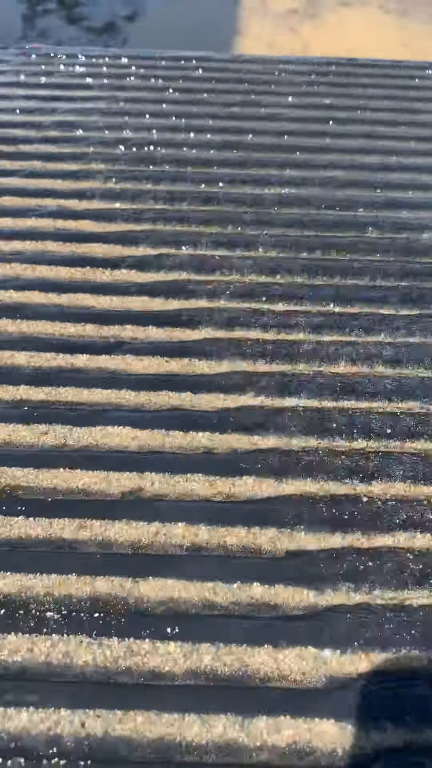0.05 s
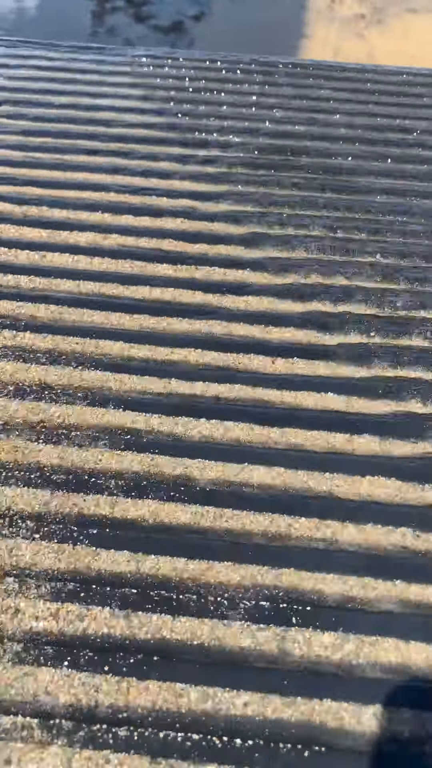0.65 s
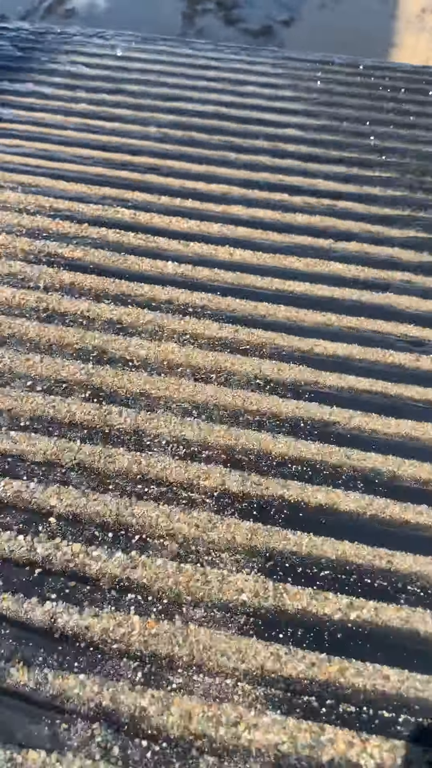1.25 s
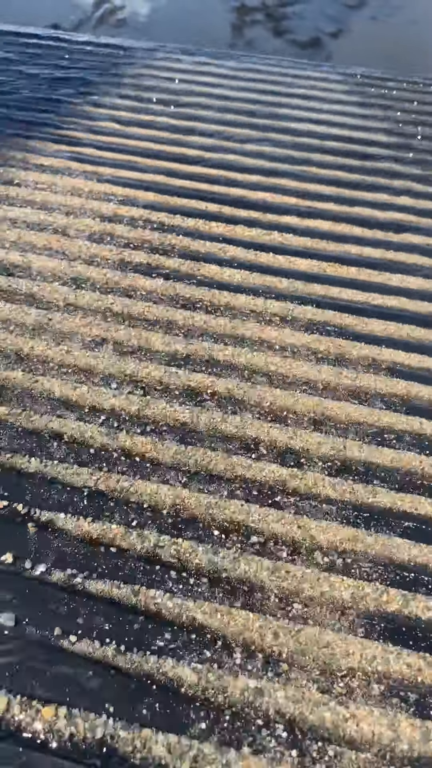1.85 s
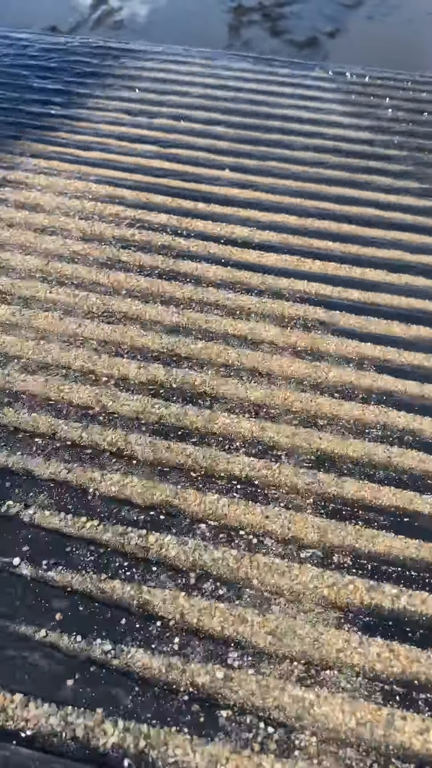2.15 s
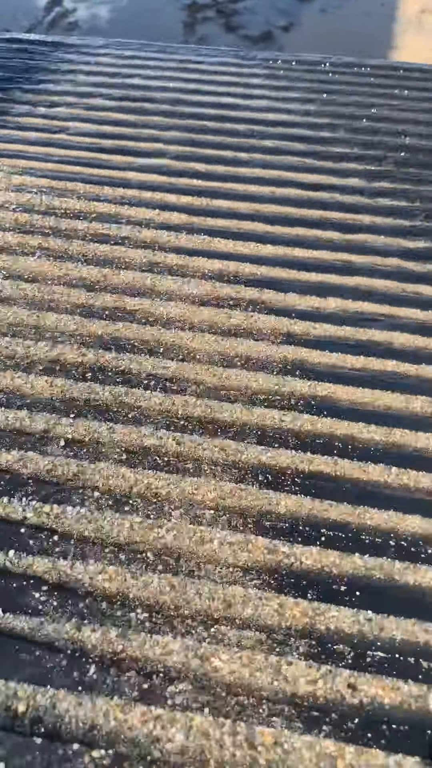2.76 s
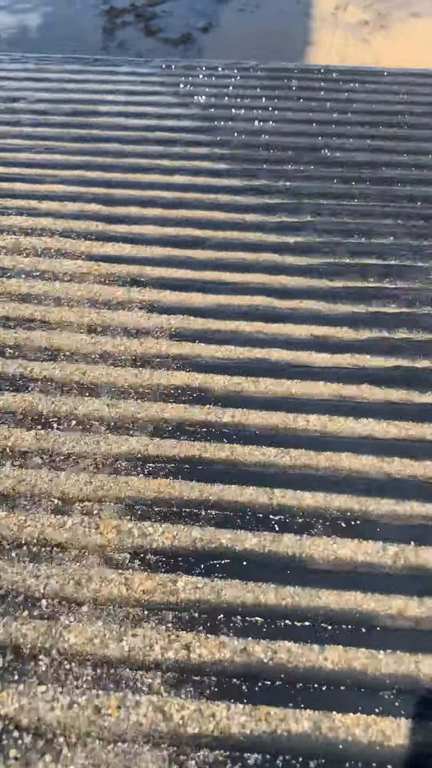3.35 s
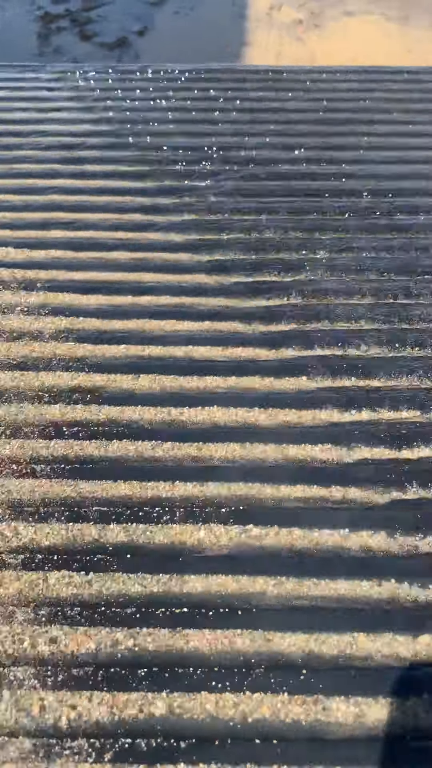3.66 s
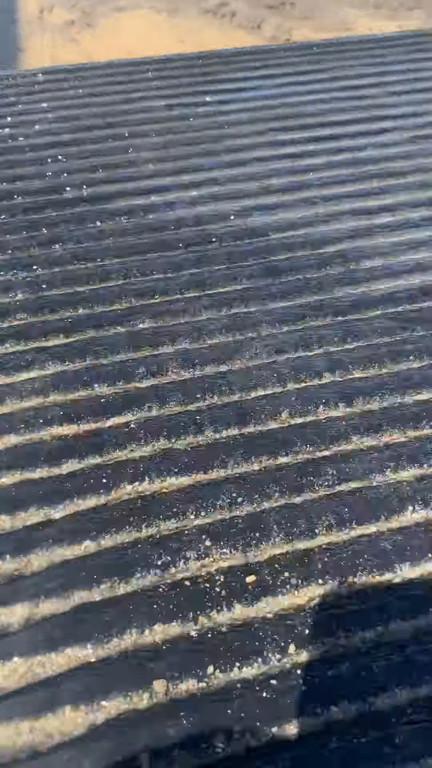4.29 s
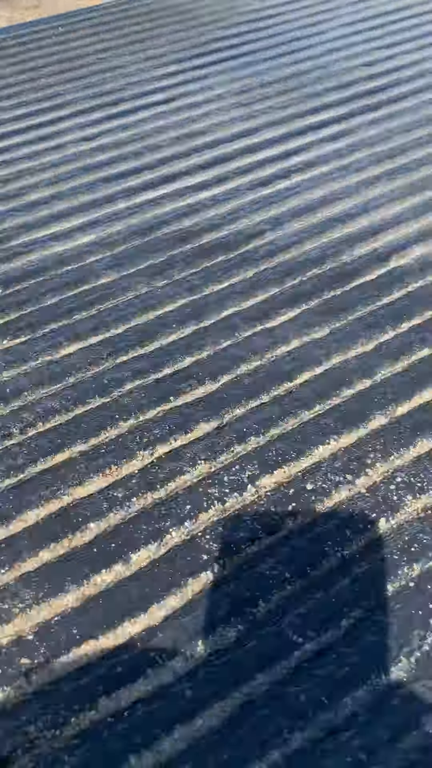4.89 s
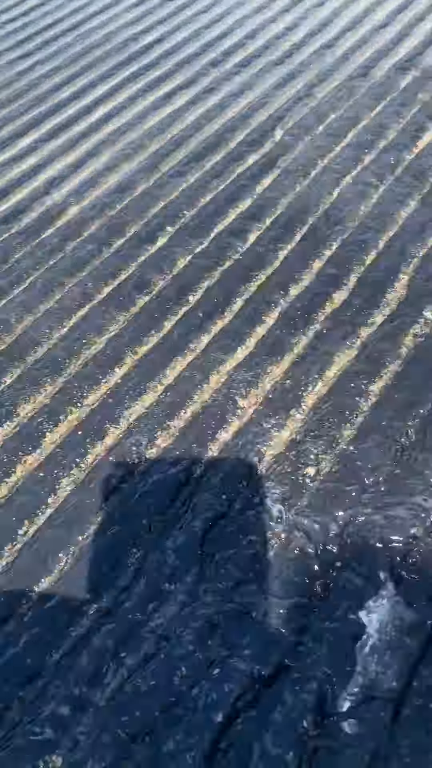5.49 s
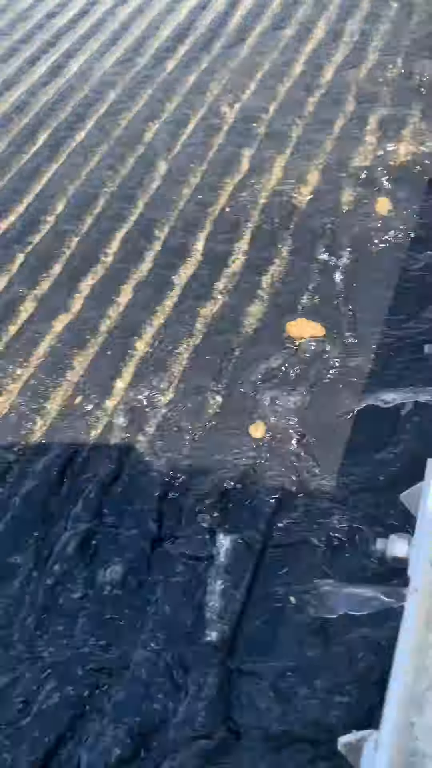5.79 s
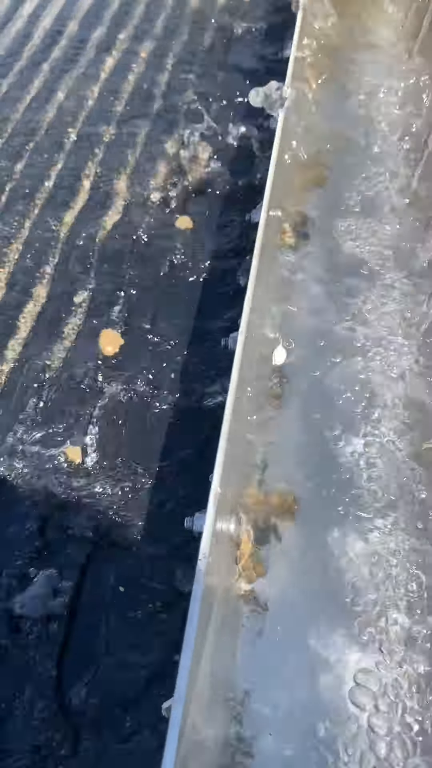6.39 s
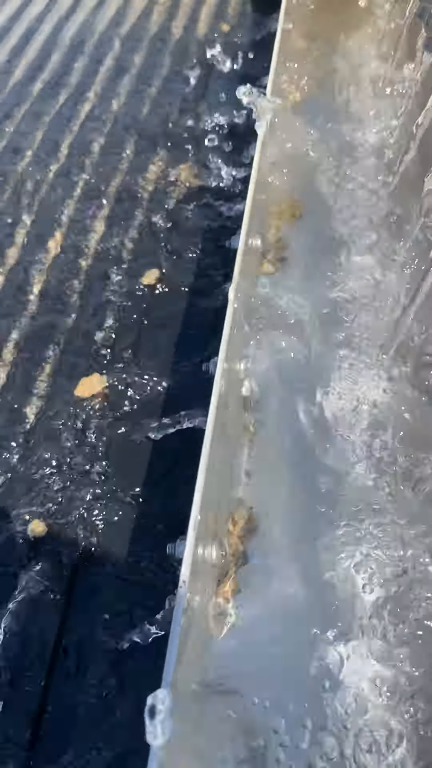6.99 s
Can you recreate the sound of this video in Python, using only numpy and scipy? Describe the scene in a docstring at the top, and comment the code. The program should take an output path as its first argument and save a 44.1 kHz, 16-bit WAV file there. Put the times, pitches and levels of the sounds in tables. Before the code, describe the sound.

From the start, a sand-washing shaker table runs outdoors with a low motor hum that throbs evenly about six times a second. Beneath it are a rumble, a dull frame rattle, soft double knocks and a faint pump drone. A thin sheet of water trickles over the ridged deck, with a fine fizz of sand and tiny bubbles and scattered drips and ticks. From about 2.5 seconds the hum slowly eases as the microphone moves away from the drive. Small waves slap from around 3 seconds. Between 4 and 5 seconds the microphone nears the edge, and water begins pouring and gurgling into a trough, pulsing with the shaking. From 5 seconds the water is close and brighter, with splashes, spray, ringing drips and sharp droplet smacks. These continue over the throbbing hum until the end at about 7 seconds.

```python
"""The drive of a sand-washing shaker table hums, throbbing under the load of six strokes a second.
A sheet of water trickles over the riffled deck, where sand and tiny bubbles fizz. Later the microphone
moves from the drive to the edge, where water pours, splashes and drips into a trough: impacts give
bursts of noise, and trapped air rings as bubbles. Beneath it all the frame rattles, slack in the drive
knocks and a pump drones."""
import sys
import numpy as np
from scipy import signal
from scipy.fft import rfft, irfft
from scipy.io import wavfile
from scipy.ndimage import uniform_filter1d

SR = 44100
rng = np.random.default_rng(int(sys.argv[2]) if len(sys.argv) > 2 else 0)


def master(y):
    """Save y as 16-bit WAV."""
    cut = np.clip(np.atleast_2d(y).T, -1, 1)
    pcm = np.round(cut * 32767)  # scale
    wavfile.write(sys.argv[1], SR, pcm.astype(np.int16))


N = 314874
T = np.arange(N) / SR
STROKE_HZ = 5.938

# Water flow over the deck. Each row: time in seconds, gain of the sheet in dB, gain of the fizz in dB.
FLOW = [(0, 1.7, -0.3), (.7, 0.6, 0), (1, 1.4, -0.5), (2.1, 2, 0.3), (3.2, 0.5, 0), (3.75, 1.4, 0.3),
        (4.2, -1.5, -3), (4.55, 0, -2.2), (7.14, 1, 2)]


def drive(hum_hz=119.95, leave_from_s=2.5, leave_to_s=6.1):
    """Modulation: each stroke's load varies the hum's amplitude, and each reversal sways its phase."""
    # The load cycle. Each row: share of the stroke, gain in dB before scaling by the throb depth.
    stroke_load = [(.02, -2.5), (.1, 4), (.21, -3.5), (.33, 3.5), (.44, 2), (.54, 4), (.66, 0), (.78, -4.5),
                   (.91, 3)]
    # The deck's response, which shapes the hum's sidebands. Each row: frequency in Hz, gain in dB.
    deck_response = [(80, 4), (100, -2), (120, 1), (134, -0.5), (148, -10), (170, -6), (300, 25)]
    away = np.clip((T - leave_from_s) / (leave_to_s - leave_from_s), 0, 1)
    level_db = -12.89 - 3.5 * away  # away from the drive the hum fades
    depth = .94 + (1.5 - .94) * away  # and its throb deepens
    share, load_db = np.transpose(stroke_load)
    throb_db = uniform_filter1d(np.interp(T * STROKE_HZ, share, load_db, period=1), int(.0068 * SR))
    turn = 4 * np.pi * (T * STROKE_HZ - .076)  # two reversals a stroke
    phase = 2 * np.pi * hum_hz * T + .54 * np.sin(turn) + .047 * np.sin(2 * turn)
    motor = np.sin(phase) * undb(depth * throb_db + .4 * walk(25.15))
    hum = unit(colour(motor, deck_response)) * undb(level_db)
    return hum + frame() * undb(.5 * (level_db - level_db.mean()))


def frame(rumble_db=-27):
    """Forced vibration: the shaken frame gives steady low tones and a rumble that swells each stroke."""
    # The frame's tones. Each entry: frequency in Hz in the first list, level in dB in the second.
    tone_hz = [47.6, 59.45, 67.63, 71.31, 77.2, 90.28, 96.21]
    tone_db = [-42.5, -38.5, -30.5, -35, -35, -44, -30.5]
    # The rumble's spectrum. Each row: frequency in Hz, relative density in dB.
    rumble_spectrum = [(20, -8), (35, -14), (50, -19), (68, 15.5), (95, 16.5), (125, 6.5), (150, 7),
                       (250, -74)]
    tones = sum(undb(db + .43 * walk(5)) * np.sqrt(2) * np.sin(2 * np.pi * (hz * T + rng.random()))
                for hz, db in zip(tone_hz, tone_db))
    jolt = 1 + 2 * per_stroke(at=.11, width=.25)
    return tones + unit(colour(rng.standard_normal(N) * jolt, rumble_spectrum)) * undb(rumble_db)


def water(near, level_db=-34, rise_db=3):
    """Air entrainment: water folds in ringing bubbles over the riffles and as it churns in the trough."""
    # Spectra of the thin sheet and of the churning. Each row: frequency in Hz, relative density in dB.
    sheet_spectrum = [(80, -9), (250, 16.5), (500, 2.5), (780, 3.5), (1050, 5.5), (1350, 0.5), (1700, -5),
                      (2400, -3), (3200, -4.5), (4500, -7), (8000, -89)]
    churn_spectrum = [(80, -55), (250, 9), (400, 5), (600, 9), (800, -1.5), (1100, 5.5), (1500, -3.5),
                      (1950, 5), (2700, -4.5), (4000, -38), (8000, -35)]
    surge = undb(.98 * per_stroke(at=.74, width=.14) + .9 * walk(22))
    sheet = unit(colour(grains(rate=6000, spread_db=3), sheet_spectrum))
    trickle = bubbles(count=1400, low_hz=1052, high_hz=4000, cycles=42, spread_db=3.5) * undb(-14)
    plops = bubbles(count=520, low_hz=599, high_hz=1380, cycles=24, spread_db=-2) * undb(-16)
    churn = unit(colour(grains(rate=2500, spread_db=4), churn_spectrum)) * undb(-2)
    froth = bubbles(count=2000, low_hz=866, high_hz=2300, cycles=25.5, spread_db=2.5) * undb(-7)
    gurgle = bubbles(count=420, low_hz=783, high_hz=2230, cycles=36, spread_db=1.5) * undb(-11.5)
    deck = np.sqrt(1 - near) * (sheet + trickle + plops) * undb(curves(FLOW)[0])
    trough = np.sqrt(near) * churn + near * froth + near ** 2 * gurgle
    return (deck + trough) * surge * undb(level_db + rise_db * near)


def pour():
    """Superposition: short bubble tones merge as water gulps over the lip, most strongly once a stroke."""
    # The swell of water over the lip. Each row: time in seconds, level in dB before the gulps.
    pour_level = [(0, -70), (4.4, -54), (4.85, -40.5), (5.25, -42), (5.6, -43), (6.4, -45), (7.14, -37.5)]
    gulps_db = 2.6 * walk(20) + 3 * per_stroke(at=.8, width=.16) - 1.5
    crowd = bubbles(count=4500, low_hz=711, high_hz=2600, cycles=18.5, spread_db=4)
    return crowd * undb(curves(pour_level)[0] + gulps_db)


def splashes(events, gain_db, spread=1.45):
    """Impact and entrainment: a rush of noise and bubbles around one pitch swells, then drains away."""
    out = np.zeros((3, N))
    t = np.arange(int(SR / 8)) / SR
    for s, db, hz, rise_s in events:
        band = signal.butter(2, [hz / spread, hz * spread], "band", fs=SR, output="sos")
        rush = signal.sosfilt(band, rng.standard_normal((3, len(t))))
        froth = np.zeros((3, len(t)))
        for when, pitch, *paths in rng.random(size=(60, 5)):
            ring = bubble(hz * spread ** (2 * pitch - 1), cycles=16, glide=.15)
            polarity = np.sign(np.array(paths)[:, None] - .5)
            add(froth, when * t[-1], polarity * ring)
        burst = (unit(rush) + unit(froth)) * t / rise_s * np.exp(-t / rise_s)
        energy = np.sum(burst ** 2, axis=1, keepdims=True)
        add(out, s, undb(db + gain_db) * burst * np.sqrt(2 * rise_s * SR / energy))
    return out


def drips(near, gain_db=5, ring_at_1khz_s=.038, glide=.07, trail_s=.03, trail_octaves=.9):
    """Bubble resonance: a drip splats and traps air that rings; in the trough fainter bubbles follow."""
    # The loudest drips. Each row: start in seconds, relative level in dB, pitch in Hz, splat from 0 to 1.
    landings = [(0.284, -27.5, 726, .3), (0.305, -27.5, 2670, 0.8), (0.363, -31, 1040, 0.2),
                (0.4152, -27, 2180, .3), (0.561, -29, 956, 0.35), (0.591, -31, 3180, 0.5),
                (0.611, -34, 2400, .2), (0.6443, -22, 2450, 0.4), (0.658, -27.5, 1100, 0.4),
                (2.8526, -22.5, 2550, 0.5), (2.945, -28.5, 1270, .3), (3.3099, -31, 3500, 0.8),
                (3.4163, -26.5, 3810, 1), (3.5134, -31, 2840, 0.8), (3.52, -23.5, 2130, 0.45),
                (3.528, -29, 1390, 0.2), (4.3093, -29, 2110, 0.6), (4.565, -21.5, 726, .5),
                (4.613, -29, 1100, 0.4), (4.749, -28, 2600, 0.8), (4.8, -29.5, 2480, 0.85),
                (5.037, -26.5, 3270, 0.9), (5.267, -25.5, 1110, 0.3), (5.372, -35, 5160, 1),
                (5.4124, -21, 2160, 0.2), (5.423, -23.5, 2040, 0.8), (5.598, -28, 5900, .5),
                (5.719, -26, 3190, 0.7), (5.733, -25.5, 4760, 1), (5.811, -28.5, 3260, 1),
                (5.82, -24.5, 1420, 0.54), (5.861, -25.5, 6160, 0.8), (6.328, -25, 1155, 0.5),
                (6.448, -23, 1090, 0.25), (6.523, -25.5, 1760, 0), (6.714, -21, 1114, 0.2),
                (6.742, -26, 1530, 0.4), (6.757, -28, 622, 0.4), (6.786, -23, 1064, 0.1),
                (6.8902, -22, 1900, 0.1), (6.979, -25.5, 1630, 0.1), (7.042, -27, 1570, 0.3),
                (7.079, -25, 1035, 0.15)]
    out = np.zeros((3, N))
    for s, db, hz, hardness in landings:
        level = undb(db + gain_db)
        cycles = ring_at_1khz_s * np.sqrt(1000 * hz)  # small, high bubbles die sooner
        ring = (1 - .35 * hardness) * bubble(hz, cycles, glide)  # a hard splat leaves less ring
        add(out, s, level * undb(2) * hardness * splat(hz, spread=1.3, decay_s=.005))
        add(out, s, level * np.array([[1], [.5], [0]]) * ring)
        for late, pitch in rng.random(size=(4, 2)):
            trailing = bubble(hz * 2 ** (trail_octaves * (pitch - .5)), cycles / 2, glide)
            add(out, s + trail_s * late, near[int(s * SR)] * level * undb(-13) * trailing)
    return out


def smacks(near, patter_gain_db=8):
    """Impact noise: a drop bursts on the deck with a sharp crack, then a short patter of droplets."""
    # The loudest drops. Each row: start in seconds, peak of the crack in dB, pitch in Hz,
    # patter against the crack in dB before its gain.
    loud_drops = [(.2515, -20, 4850, -18), (1.4675, -23, 11800, -19), (2.1875, -24, 7600, -18),
                  (2.7065, -23, 7450, -18), (3.5905, -23, 8400, -17), (1.902, -19.5, 7500, -11),
                  (1.9129, -22, 6300, -18), (2.1369, -23, 10500, -24), (2.3578, -18.5, 10300, -23),
                  (2.5486, -15.5, 9900, -15), (2.7958, -27, 4930, -18), (3.4166, -24, 4400, -15),
                  (3.6841, -19, 8900, -9.5), (3.9259, -20, 14000, -21), (3.9425, -23, 9000, -12),
                  (4.2962, -17, 9100, -25), (4.5524, -20, 11200, -16), (4.5655, -17, 12900, -20),
                  (4.6105, -23, 8460, -18), (4.6585, -23, 10400, -19), (4.8315, -23, 7200, -18),
                  (5.0369, -6.5, 5300, -25), (5.0785, -20, 7730, -17), (5.1404, -25, 12500, -17),
                  (5.2081, -11.5, 11200, -16), (5.2846, -12.5, 6400, -19), (5.4085, -14.5, 5500, -16),
                  (5.425, -12.5, 6540, -10), (5.4905, -9.5, 10500, -20), (5.4995, -12.5, 6960, -27),
                  (5.5362, -26, 9500, -20), (5.6502, -16, 8350, -15), (5.7804, -10, 7300, -25),
                  (5.8154, -15.5, 6950, -10), (5.8222, -14, 8200, -18), (5.9235, -14, 11700, -19),
                  (5.9508, -6, 12500, -24), (5.9619, -16, 9930, -19), (5.9869, -13.5, 5800, -15),
                  (6.1505, -16, 6000, -16), (6.2517, -12.5, 9100, -12), (6.3388, -10, 9500, -10.5),
                  (6.3783, -11, 9900, -13), (6.4201, -14, 11800, -14), (6.4536, -11, 9300, -18),
                  (6.4783, -12, 8900, -13), (6.6292, -7, 13100, -25), (6.6336, -19, 12100, -24),
                  (6.6597, -24, 8900, -26), (6.6974, -14, 7240, -12), (6.7399, -17, 12000, -13),
                  (6.7769, -9, 10700, -24), (6.7798, -12, 10800, -16), (6.8589, -14, 10400, -13),
                  (6.8871, -15, 9600, -12), (6.9687, -18, 10520, -19), (7.0875, -16, 11730, -18)]
    drops = list(loud_drops)
    for when, chance, faintness, pitch in rng.random(size=(130, 4)):
        close = near[int(when * N)]
        if chance < close:  # stray drops come thicker and louder by the trough
            drops.append((when * N / SR, -28 + 10 * close - 9 * faintness, 6000 * 2 ** pitch, -17))
    out = np.zeros((3, N))
    for s, db, hz, patter_db in drops:
        crack = splat(hz, spread=1.45, decay_s=.00036)
        patter = splat(hz, spread=1.45, decay_s=.003)
        add(out, s, undb(db) * (crack + undb(patter_db + patter_gain_db) * patter))
    return out


def spray(near, level_db=-43, rise_db=8.5):
    """Shot noise: sand and tiny bubbles blend into fizz on the deck; droplets spatter by the trough."""
    # Spectra of deck fizz and trough spray. Each row: frequency in Hz, relative density in dB.
    fizz_spectrum = [(1200, -30), (2800, -14), (4200, 7.5), (6500, 6.5), (8500, 4.5), (11000, 1),
                     (13500, -2), (16000, -3.5)]
    spray_spectrum = [(1200, -31), (2800, 9), (4200, 7.5), (6500, 3.5), (8500, 6.5), (11000, 4),
                      (13500, 4.5), (16000, -1.5)]
    fizz = unit(colour(grains(rate=9000, spread_db=1.5), fizz_spectrum))
    fizz *= undb(1.24 + curves(FLOW)[1] + .64 * walk(14) + .5 * walk(40) + per_stroke(at=.5, width=.16))
    bursts = undb(1.7 * walk(160) + walk(28) + 2.4 * per_stroke(at=.52, width=.16))
    clicks = grains(rate=5000, spread_db=3) + .45 * rng.standard_normal((3, N))
    splash = unit(colour(clicks * bursts, spray_spectrum))
    spatter = bubbles(count=1100, low_hz=5200, high_hz=8400, cycles=34, spread_db=3)
    mist = bubbles(count=1300, low_hz=8400, high_hz=16600, cycles=14, spread_db=3)
    droplets = unit((spatter + 1.5 * mist) * bursts) * undb(-3.5)
    blend = np.sqrt(1 - near) * fizz + np.sqrt(near) * (splash + droplets)
    return blend * undb(level_db + rise_db * near ** 2)


def grit(near, level_db=-51):
    """Small resonators ring high and briefly: sand grains and pinhead bubbles tick in flurries."""
    ticks = bubbles(count=900, low_hz=5500, high_hz=15500, cycles=14, spread_db=4.5)
    flurries = undb(2.5 * walk(12))
    return np.sqrt(1 - near) * ticks * flurries * undb(level_db + curves(FLOW)[1])


def slosh():
    """Forced sloshing: water slaps the riffles and the edge, once hard and once softly in each stroke."""
    # The spectrum of the slaps. Each row: frequency in Hz, relative density in dB.
    slosh_spectrum = [(60, -45), (160, 11.5), (250, 1), (370, 2.5), (550, 3), (750, -10), (1200, -14),
                      (2500, -43)]
    # Their strength. Each row: time in seconds, level in dB.
    slosh_level = [(0, -39.5), (3.2, -61), (4.1, -42), (5.6, -41), (7.14, -34)]
    slap = .2 + per_stroke(at=.84, width=.09) + .5 * per_stroke(at=.38, width=.05)
    impacts = grains(rate=3000, spread_db=.5) * slap * undb(1.6 * walk(4.42))
    return unit(colour(impacts, slosh_spectrum)) * undb(curves(slosh_level)[0])


def rattle(near, level_db=-33, fade_db=5):
    """Impact excitation: small blows set the frame clattering, hardest where the stroke reverses."""
    # The frame's resonances. Each row: frequency in Hz, relative density in dB.
    rattle_spectrum = [(60, -54), (130, -23), (160, 7), (185, 7), (240, -4), (310, -14.5), (370, 0.5),
                       (460, -13.5), (700, -34), (1500, -56)]
    push = 1 + 1.6 * per_stroke(at=.97, width=.2) + .43 * per_stroke(at=.37, width=.045)
    impacts = grains(rate=1200, spread_db=3) * push
    return unit(colour(impacts, rattle_spectrum)) * undb(level_db - fade_db * near)


def knocks(level_db=-42, decay_s=.009):
    """Backlash: slack in the drive gives a dull double knock as the deck reverses at the stroke's end."""
    # The two blows. Each row: share of the stroke, relative level in dB.
    strikes = [(0.757, -1), (0.871, 0)]
    # The resonances they excite. Each row: frequency in Hz, relative density in dB.
    thud_spectrum = [(100, -33), (200, 9.5), (260, 0.5), (370, 5), (600, 0), (800, -10), (1500, -22)]
    blows = sum(undb(db) * np.exp(-((T * STROKE_HZ - at) % 1) / STROKE_HZ / decay_s) for at, db in strikes)
    return unit(colour(rng.standard_normal((3, N)) * blows, thud_spectrum)) * undb(level_db)


def pump(near, shaft_hz=41.73, wander=.001917, gain_db=-1):
    """Harmonic series: a pump drones at multiples of its shaft rate, roughened by the shaking."""
    # The drone's partials. Each row: multiple of the shaft rate, relative level in dB over the deck,
    # relative level in dB at the trough.
    harmonics = [(5, -41, -40.5), (6, -44.5, -38), (7, -52, -44), (8, -45, -43.5), (11, -48.5, -75),
                 (12, -51.5, -43.5), (13, -55, -63), (14, -51, -43), (15, -49.5, -45), (16, -52.5, -41),
                 (17, -75, -47), (19, -48.5, -45.5), (23, -46.5, -48.5), (29, -56.5, -47.5), (32, -49, -55),
                 (37, -54.5, -44.5)]
    turns = np.cumsum(shaft_hz * (1 + wander * walk(2))) / SR
    out = np.zeros((3, N))
    for order, deck_db, trough_db in harmonics:
        flutter_db = (2.2 + .8 * near) * walk(35) + walk(5) - 1.3 * near
        # The two scattered paths waver most in phase.
        drift = np.array([(.5 + .5 * near) * walk(30), 1.3 * walk(22), 1.3 * walk(22)])
        drift += 2 * np.pi * rng.random((3, 1))
        level = undb(deck_db + near * (trough_db - deck_db) + gain_db + flutter_db)
        out += np.sqrt(2) * level * np.sin(2 * np.pi * order * turns + drift)
    return out


def bubble(hz, cycles, glide):
    """A damped oscillator: trapped air rings down 40 dB over its cycles, rising in pitch as it surfaces."""
    age = np.arange(int(cycles / hz * SR) + 2) * hz / (cycles * SR)
    tone = np.sin(2 * np.pi * cycles * (age + glide * age ** 2 / 2))
    return tone * np.exp(-np.log(100) * age) * (1 - np.exp(-age * cycles))


def bubbles(count, low_hz, high_hz, cycles, spread_db):
    """Incoherent addition: bubbles ring at random times, with random sign in the two scattered streams."""
    out = np.zeros((3, N))
    for when, pitch, faintness, ring, *paths in rng.random(size=(count, 6)):
        hz = min(low_hz * (high_hz / low_hz) ** pitch, .4 * SR)
        polarity = np.array([[1], *np.sign(np.array(paths)[:, None] - .5)])
        level = undb(-spread_db * np.log(faintness + .042))
        add(out, when * N / SR, polarity * level * bubble(hz, cycles * (.5 + ring), glide=.19))
    return unit(out)


def splat(hz, spread, decay_s):
    """An impact transient: band noise starts at once and decays; peak 1 in each of three streams."""
    t = np.arange(int(SR / 25)) / SR
    band = signal.butter(1, [hz / spread, min(hz * spread, .45 * SR)], "band", fs=SR, output="sos")
    burst = signal.sosfilt(band, rng.standard_normal((3, len(t))) * np.exp(-t / decay_s))
    return burst / np.abs(burst).max(axis=1, keepdims=True)


def grains(rate, spread_db):
    """Shot noise: three independent streams of `rate` clicks a second, most small and a few large."""
    size = undb(spread_db * np.minimum(rng.exponential(size=(3, N)), 5))
    return unit((rng.random((3, N)) < rate / SR) * size * rng.choice([-1, 1], (3, N)))


def per_stroke(at, width):
    """Periodic envelope: a smooth bump centred on a share of each stroke."""
    return np.exp(-(((T * STROKE_HZ - at + .5) % 1 - .5) / width) ** 2)


def walk(rate):
    """Low-pass noise: random levels held for 1 / rate seconds and smoothed twice."""
    hold = int(SR / rate)
    steps = np.repeat(rng.standard_normal(N // hold + 1), hold)
    return 1.436 * uniform_filter1d(uniform_filter1d(steps, hold), hold)[:N]


def response(spectrum):
    """Frequency response: a gain for each bin, from (Hz, dB) points joined on a log frequency axis."""
    hz, db = np.transpose(spectrum)
    f = np.fft.rfftfreq(N, 1 / SR)
    return undb(np.interp(np.log(f + 1), np.log(hz), db))


def colour(x, spectrum):
    """Linear filtering by (Hz, dB) points."""
    return irfft(rfft(x) * response(spectrum), N)


def curves(table):
    """Linear interpolation of each later column over the times in the first."""
    s, *columns = np.transpose(table)
    return [np.interp(T, s, column) for column in columns]


def add(out, s, sound):
    """Superpose a short sound at s seconds."""
    start = max(int(s * SR), 0)
    n = max(min(sound.shape[-1], out.shape[-1] - start), 0)
    out[..., start:start + n] += sound[..., :n]


def undb(db):
    """Decibels to amplitude ratio."""
    return 10 ** (np.asarray(db) / 20)


def unit(x):
    """Normalise to rms 1."""
    return x / np.sqrt(np.mean(x ** 2))


def ports(streams, lag_s=1 / 4250):
    """Direct and diffuse fields: stream 0 reaches both microphone ports, streams 1 and 2 one port each."""
    # Phase between the ports. Each row: frequency in Hz, lead of the left port in radians.
    port_phase = [(0, 0), (300, 0), (900, -1.1), (1400, 0), (2000, 1.5), (2900, 2.3), (3400, 1.4),
                  (4650, 3.14)]
    # Scattered sound. Each row: frequency in Hz, level against the direct sound in dB.
    diffuse_ratio = [(100, 12), (250, -11), (500, -2), (1000, 1.5), (2000, 1), (3200, 0), (4600, -20),
                     (8000, -18), (15000, -12)]
    f = np.fft.rfftfreq(N, 1 / SR)
    hz, radians = np.transpose(port_phase)
    # Above the last row the lead grows as a pure delay.
    lead = np.interp(f, hz, radians) + 2 * np.pi * lag_s * np.maximum(f - hz[-1], 0)
    scatter = response(diffuse_ratio)
    spectra = rfft(streams)
    direct = spectra[0] * np.exp(.5j * np.outer([1, -1], lead))
    return irfft((direct + scatter * spectra[1:]) / np.sqrt(1 + scatter ** 2), N)


def scene(balance_db=.36, hum_lag_s=.00011):
    """Superposition: the drive reaches both ports almost alike; the rest comes from all over the table."""
    # The microphone's path. Each row: time in seconds, closeness to the trough from 0 to 1.
    approach = [(0, 0.07), (3.6, 0.1), (4.4, 0.36), (4.85, 0.66), (5.7, 0.92), (7.14, 0.93)]
    # Waves that slap the side of the deck, and sheets of water that break into froth.
    # Each row: start in seconds, relative level in dB, pitch in Hz, rise time in seconds.
    waves = [(2.975, -32, 370, 0.014), (3.665, -31.5, 370, .02), (3.825, -32.5, 380, 0.014),
             (3.99, -31, 400, 0.018), (4.16, -28, 450, 0.011), (4.672, -35, 356, .015),
             (4.835, -29, 470, 0.015), (5.005, -33, 506, 0.014), (5.18, -33, 384, 0.014),
             (5.51, -31, 410, .016), (5.675, -31, 417, 0.0094), (5.85, -31, 440, 0.012),
             (6.012, -33, 417, .016), (6.515, -27.5, 447, 0.013), (6.685, -31, 440, 0.019)]
    breaking_sheets = [(1.9, -36, 6950, 0.0091), (3.512, -35, 1480, 0.0097), (4.298, -32, 4700, 0.0071),
                       (4.307, -31, 1700, 0.0064), (4.608, -33, 1120, .007), (4.635, -34, 1840, .007),
                       (4.851, -32, 1710, 0.011), (5.072, -37, 8000, 0.0045), (5.197, -30, 1190, .007),
                       (5.263, -34, 1120, 0.0058), (5.305, -30, 1160, 0.0033), (5.363, -32, 4280, 0.0062),
                       (5.408, -32, 1890, 0.0068), (5.63, -31.5, 3400, 0.016), (5.643, -32, 8000, 0.0068),
                       (5.8, -36, 3220, 0.0086), (5.988, -27.5, 1236, 0.011), (6.027, -24.5, 1710, 0.006),
                       (6.143, -32, 6400, .009), (6.33, -29, 1410, 0.0093), (6.505, -31, 1640, 0.0082),
                       (6.855, -36, 1520, 0.0077), (7.015, -30, 1420, .015), (7.072, -31, 1040, .01)]
    near = curves(approach)[0]
    streams = pump(near) + rattle(near) + slosh() + knocks()
    streams += water(near) + pour() + spray(near) + grit(near) + smacks(near) + drips(near)
    streams += splashes(waves, gain_db=0) + splashes(breaking_sheets, gain_db=-1.9)
    hum = drive()
    left = np.interp(T - hum_lag_s, T, hum) * undb(balance_db)
    right = hum * undb(-balance_db)
    return ports(streams) + np.array([left, right])


def record(dry, top_hz=15900, fade_s=.008):
    """Band limiting: a steep low-pass cuts the top, and short fades soften both ends."""
    fades = np.minimum(np.minimum(T, T[-1] - T) / fade_s, 1)
    return signal.sosfilt(signal.ellip(10, .2, 80, top_hz, fs=SR, output="sos"), dry * fades)


dry = scene()
out = record(dry)
master(out)
```